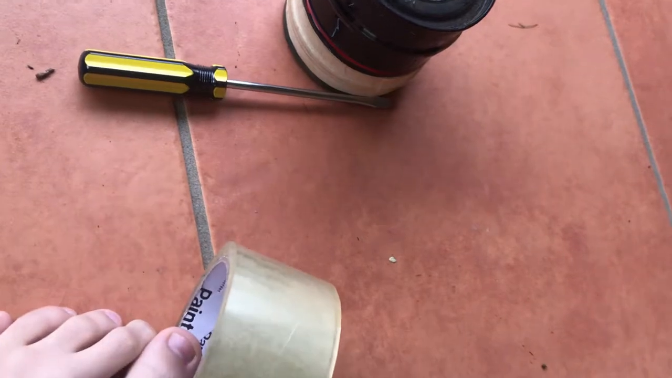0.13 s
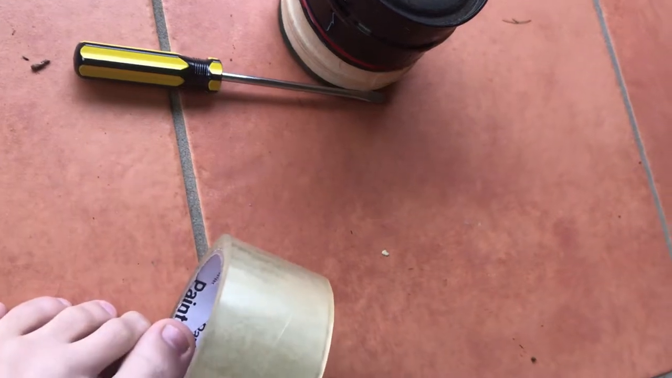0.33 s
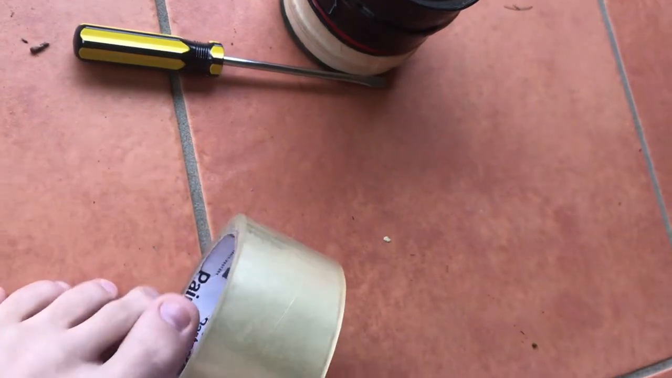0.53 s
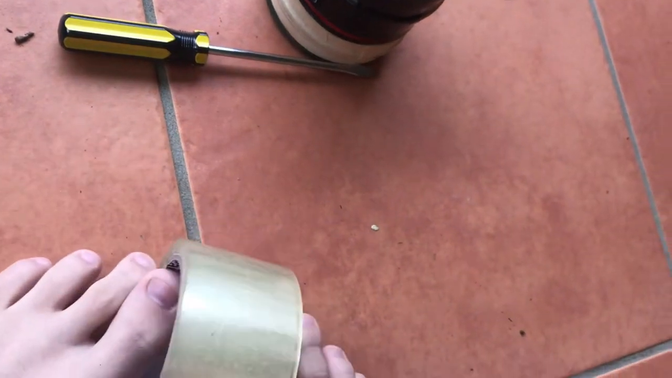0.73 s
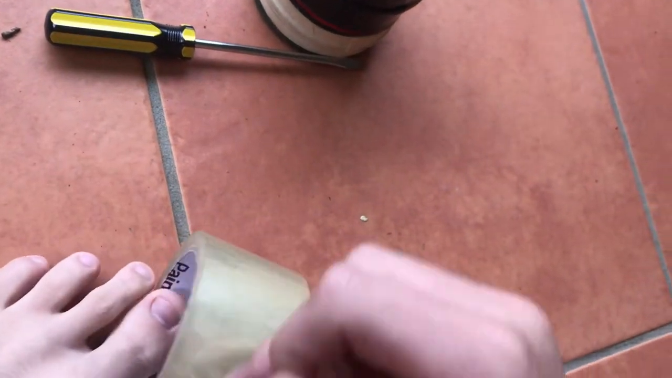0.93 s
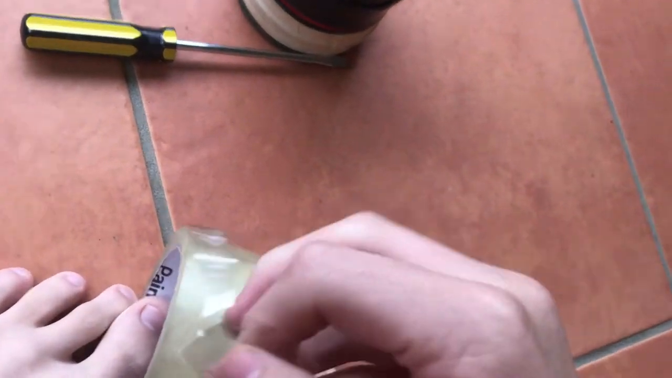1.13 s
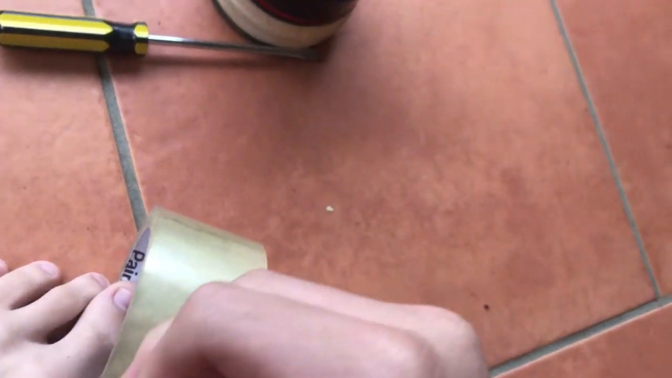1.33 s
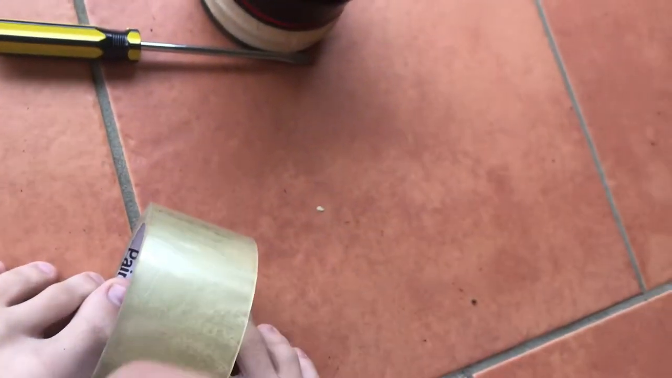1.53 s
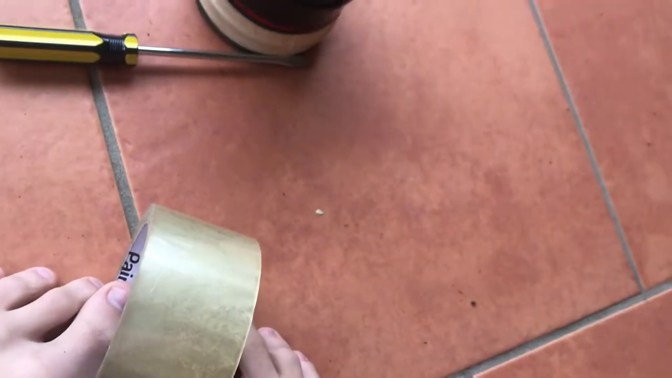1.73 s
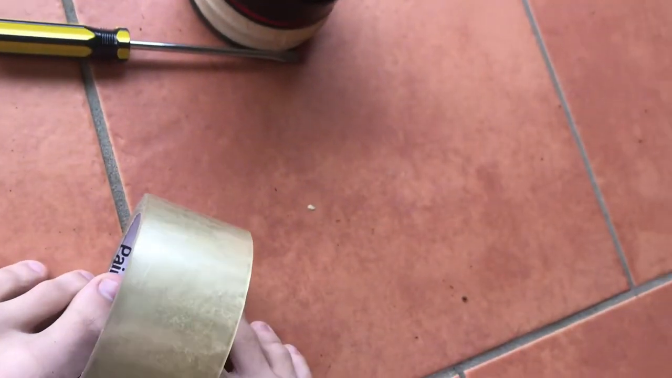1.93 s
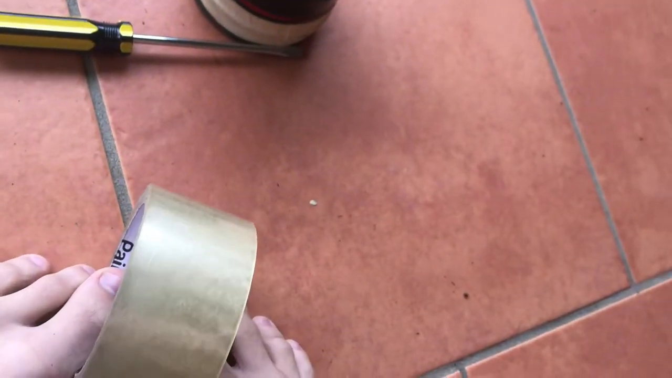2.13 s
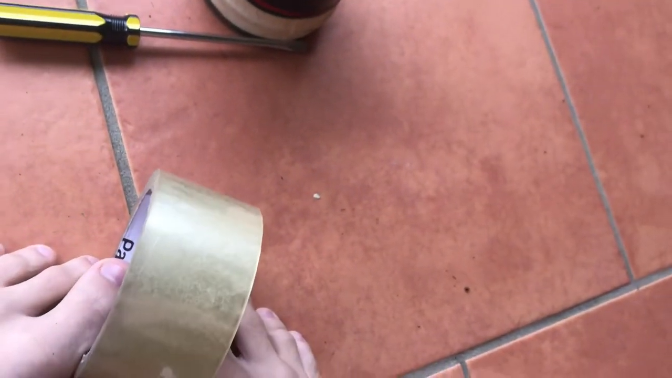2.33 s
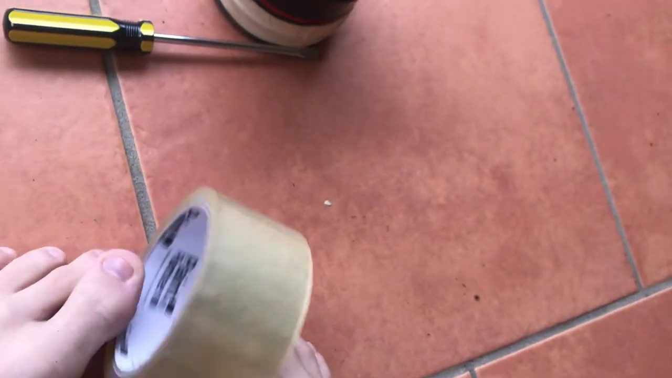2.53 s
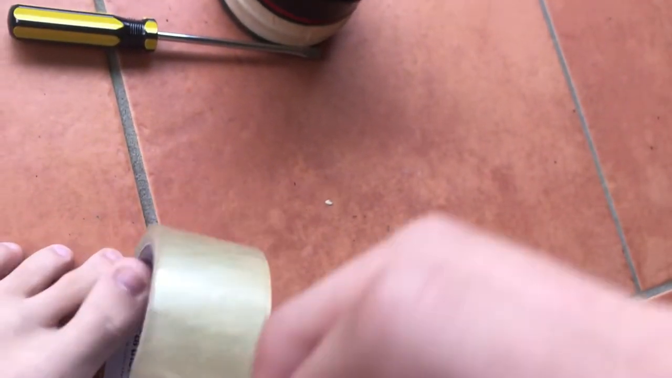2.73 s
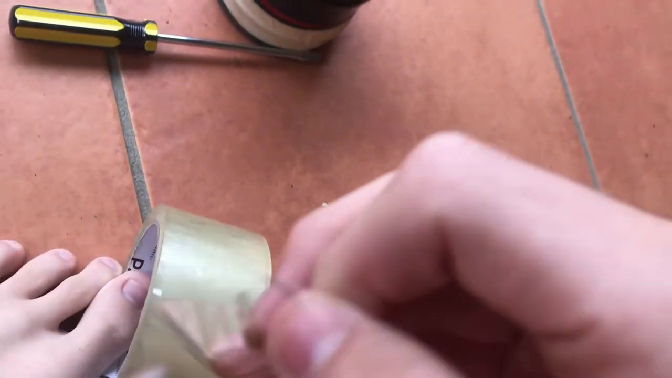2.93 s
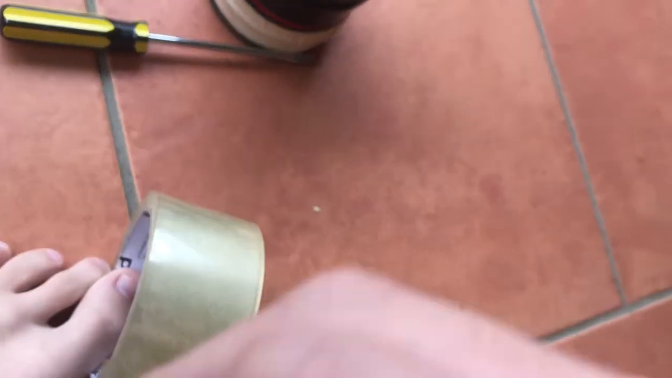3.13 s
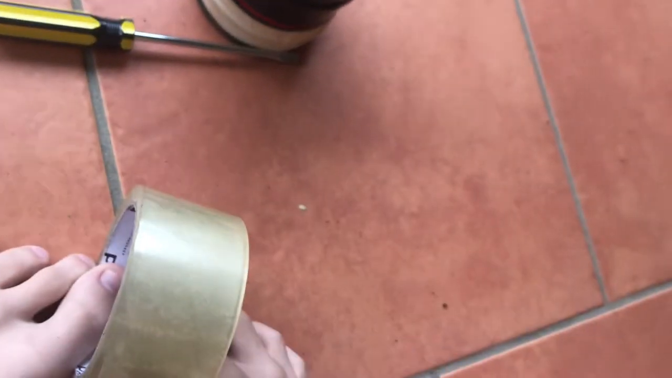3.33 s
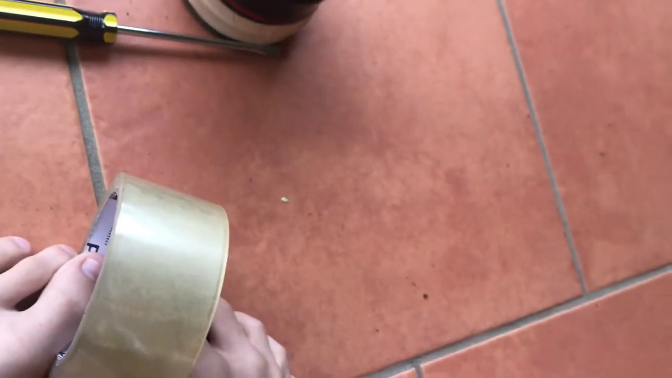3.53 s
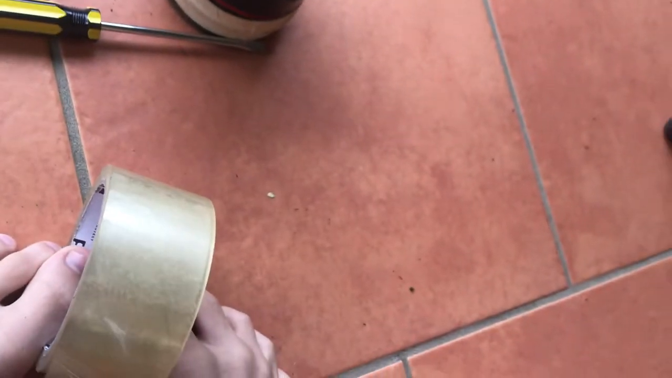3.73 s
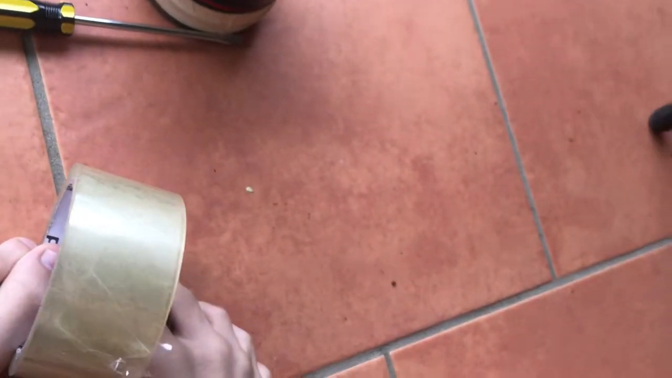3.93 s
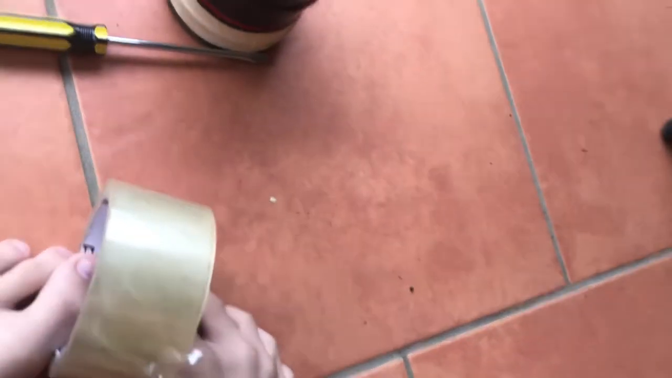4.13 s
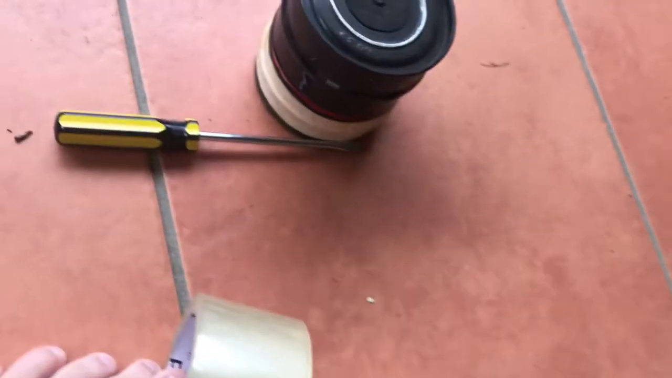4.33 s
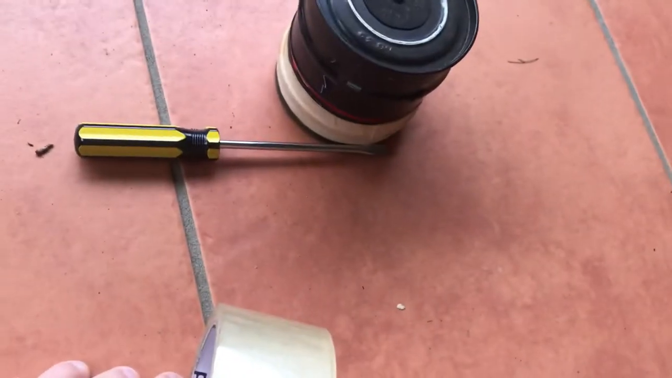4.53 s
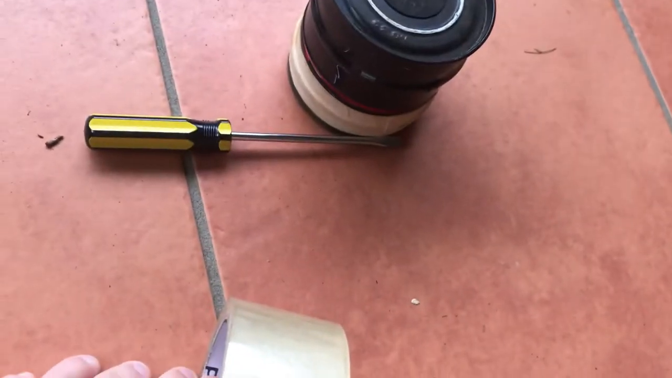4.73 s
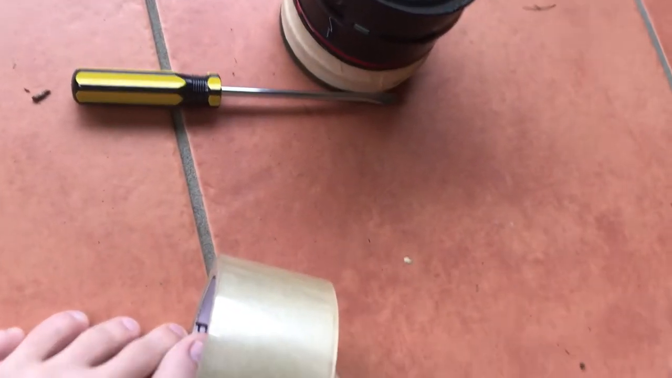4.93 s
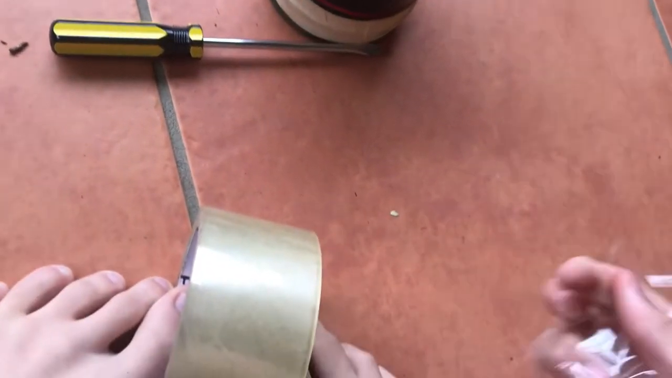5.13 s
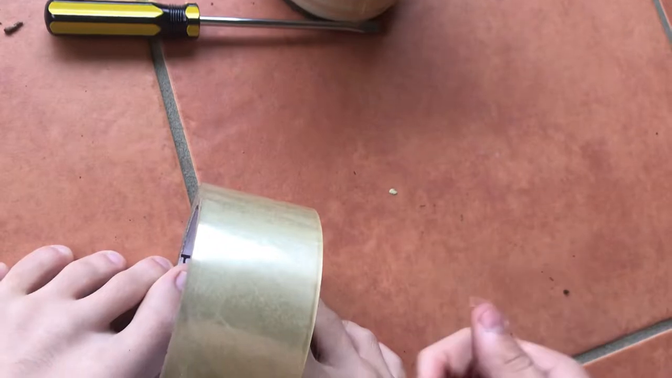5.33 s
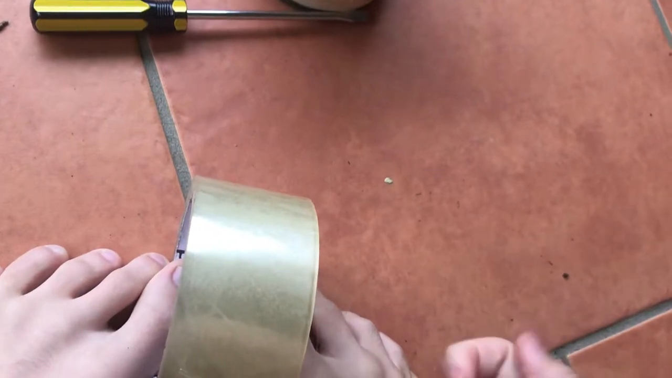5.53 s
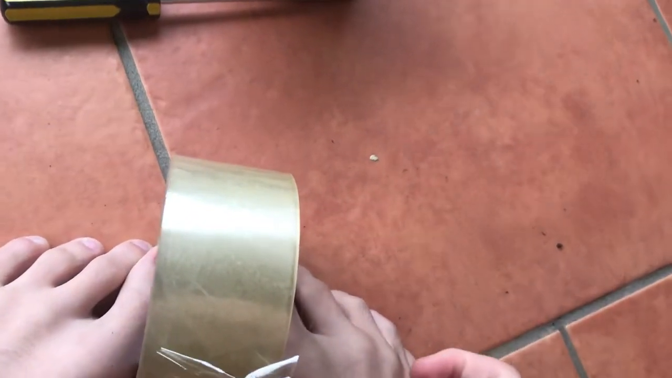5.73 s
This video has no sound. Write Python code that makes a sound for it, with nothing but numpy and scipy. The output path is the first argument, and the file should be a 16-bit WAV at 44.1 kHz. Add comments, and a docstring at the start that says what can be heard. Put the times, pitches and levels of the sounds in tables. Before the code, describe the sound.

Clear packing tape is ripped off its roll in sharp crackling volleys with low thumps, then loose film ticks and rustles in fingers.

```python
"""Sharp cracks tear out in quick volleys as clear packing tape is pulled off a roll on a tiled floor.
The glue fails by stick-slip: each slip is a burst of tiny fractures that rings the taut strip, and the
hardest send a dispersive bending wave along it, heard as a falling thump. Around and after the pulls
the loose film ticks, rustles and squeaks in the fingers as creases snap and skin drags on it. The roll
bumps dully against the feet, tiles and walls return a dense echo, and a low murmur dips and swells back."""
import sys
import numpy as np
from scipy import signal
from scipy.fft import rfft, irfft
from scipy.io import wavfile

SR = 44100
rng = np.random.default_rng(int(sys.argv[2]) if len(sys.argv) > 2 else 0)


def output_pcm(signal):
    """Save a mono or channel-first signal as 16-bit PCM at the path in sys.argv[1].

    Samples are clipped to [-1, 1] before scaling.
    """
    pcm = np.clip(np.atleast_2d(signal).T, -1, 1) * 32767
    wavfile.write(sys.argv[1], SR, np.round(pcm).astype(np.int16))


N = 255331
TIME = np.arange(N) / SR


def gain_of(db):
    """Logarithmic level: 20 dB is a factor of ten in amplitude."""
    return 10 ** (np.asarray(db) / 20)


def evened(x):
    """Power normalisation: scales a signal to rms 1."""
    return x / np.sqrt(np.mean(x ** 2) + 1e-20)


def read(points, hz):
    """Constant-ratio hearing: interpolates a spectrum table on a logarithmic frequency axis."""
    table_hz, value = np.transpose(points)
    return np.interp(np.log(hz + 1), np.log(table_hz + 1), value)


def add(mix, s, sound):
    """Superposition: sums a sound into the mix, in place, at time s."""
    part = mix[max(round(s * SR), 0):][:len(sound)]
    part += sound[:len(part)]


def colour(x, points, size=4096):
    """Minimum-phase filtering: a causal filter with the given spectrum keeps attacks sharp."""
    log_gain = np.log(gain_of(read(points, abs(np.fft.fftfreq(size, 1 / SR)))))
    # the phase of a minimum-phase filter is the Hilbert transform of its log gain
    spectrum = np.exp(np.conj(signal.hilbert(log_gain)))
    taps = np.fft.ifft(spectrum).real
    return signal.oaconvolve(x, taps[:size // 2])[:N]


def resonate(x, hz, width_hz):
    """Damped resonance of peak gain 1: shifts the curve hz to zero, smooths, and shifts back."""
    turn = np.exp(2j * np.pi * np.cumsum(hz) / SR)
    r = np.exp(-np.pi * width_hz / SR)
    smoothed = signal.lfilter([1 - r], [1, -r], x / turn + 1e-18)
    return 2 * (turn * smoothed).real


def slips(rise_s=0.000086, sag_db=4, fall_s=0.0033, flutter_db=-16, flutter_fall_s=0.015, size=2048):
    """Stick-slip fracture: the glue fails across the width of the tape, then the film shivers briefly."""
    # slips of the peel line: (time [s], relative level [dB], length [s])
    slip_table = [(0.0, -13, 0.0013), (0.0129, -15.5, 0.0095), (.033, -13, 0.0062), (0.11, -13, 0.0069),
                  (0.1292, -14, 0.0083), (0.1395, -18.5, 0.016), (0.1589, -9, 0.0012), (0.252, -10, 0.0019),
                  (0.26, -13.5, 0.0035), (.2693, -14, 0.0025), (0.971, -20, 0.0014), (1.1095, -22, 0.0014),
                  (1.1731, -13.5, 0.0012), (1.2038, -11, 0.00098), (1.2112, -10, 0.0021),
                  (1.2496, -11, 0.0025), (1.2803, -9, .002), (1.3246, -7.5, 0.00093),
                  (1.3356, -15.5, 0.0022), (1.3651, -14.5, 0.0068), (1.3779, -10, 0.0028),
                  (1.3982, -10, 0.0014), (1.411, -11, 0.0021), (1.4224, -15, 0.0059), (1.4338, -7, 0.00096),
                  (1.457, -11, 0.0013), (1.4662, -10.5, 0.0016), (1.492, -7.5, 0.00081),
                  (1.526, -10, 0.0018), (1.5573, -8.5, 0.0017), (1.586, -13, 0.0091), (1.61, -11.5, 0.0035),
                  (1.623, -11.5, 0.004), (1.637, -7.5, 0.0013), (1.655, -14.5, 0.0097),
                  (1.6952, -14.5, 0.0024), (1.781, -6, 0.0012), (1.7902, -14.5, 0.0035),
                  (1.8216, -9, 0.0024), (1.8716, -6.5, 0.00066), (1.908, -8.5, 0.0023),
                  (1.9465, -10.5, 0.0014), (1.986, -10.5, 0.00094), (2.0119, -12.5, 0.0017),
                  (2.0585, -13, 0.0031), (2.0775, -16.5, 0.0031), (2.1083, -13, 0.0017),
                  (2.1242, -15, 0.0013), (2.1374, -13.5, 0.0023), (2.1805, -11.5, .0025),
                  (2.7285, -14.5, 0.00094), (2.8613, -11, 0.0013), (2.8967, -14.5, 0.0018),
                  (2.9272, -12.5, 0.0045), (2.989, -15.5, 0.012), (3.0301, -15, 0.013),
                  (3.0502, -16.5, 0.01), (3.0677, -14.5, 0.0089), (3.1106, -13.5, 0.0052),
                  (3.1642, -15, 0.0031), (3.1946, -17.5, 0.0094), (3.2438, -14, 0.0023),
                  (3.276, -11.5, 0.0032), (3.4415, -8, .0035), (3.5098, -15, 0.0053), (3.56, -9, 0.0025),
                  (3.6638, -14, 0.0036), (3.777, -15.5, 0.0056), (3.7917, -16, 0.0034)]
    # colour that the roll gives to each crack: (frequency [Hz], gain [dB])
    roll_colour = [(100, 1.5), (300, 0), (550, 1), (800, -5.5), (1050, 0), (1500, -4.5), (1900, 0),
                   (2800, 1.5), (3500, -0.5), (5500, -0.5), (9500, -0.5), (10400, -3.5), (11600, -0.5),
                   (15500, -2)]
    out, t = np.zeros(N), np.arange(size) / SR
    flutter = gain_of(flutter_db) * np.exp(-t / flutter_fall_s)
    for s, db, length in slip_table:
        length, pull = max(length, 1 / SR), pull_at(s)
        running = gain_of(-sag_db * np.minimum(t / length, 1))
        running = running * np.exp(-np.maximum(t - length, 0) / fall_s)
        shape = (1 - np.exp(-t / rise_s)) * np.hypot(running, flutter)
        burst = crack(shape, pull["body_db"], pull["sizzle_db"], grain_db=3.5)
        # longer slips release more energy
        add(out, s, gain_of(db) * np.sqrt(length * SR) * burst)
    return gain_of(1.98) * colour(out, roll_colour)


def crack(shape, body_db, sizzle_db, grain_db):
    """Fracture noise: a volley of uneven micro-fractures under an envelope, in three bands; energy 1."""
    # body, middle and sizzle bands: (lower edge [Hz], upper edge [Hz])
    crack_bands = [(400, 1400), (1400, 5500), (5500, 17000)]
    out = np.zeros(len(shape))
    # each random strength holds for 8 samples
    grain = np.repeat(rng.standard_normal(len(shape)), repeats=8)[:len(shape)]
    sizes = shape * gain_of(grain_db * grain)
    for edges, db in zip(crack_bands, (body_db, 0, sizzle_db)):
        volley = sizes * rng.standard_normal(len(shape))
        band = signal.lfilter(*signal.butter(2, edges, "bandpass", fs=SR), volley)
        out += gain_of(db) * evened(band)
    # a reflection from the edge of the film interferes, so each crack is coloured differently
    delay_s = rng.uniform(0.00018, 0.0009)
    add(out, delay_s, 0.18 * rng.choice([-1, 1]) * out)
    return out / np.linalg.norm(out)


def pull_at(t):
    """Tension and free length set the pitch: the strip tightens and glides during the latest pull."""
    # pulls of the hand: (start [s], length [s], time to tighten [s], first pitch [Hz], last pitch [Hz],
    # first ring [dB], last ring [dB], strip body [dB], crack body [dB], crack sizzle [dB], echo [dB])
    pull_table = np.array([(-0.02, .32, .01, 974, 674, 5.5, 0, 0, -6, -2, -2),
                           (0.939, 0.44, 1, 968, 697, -3, 7.5, -12, 6.5, -2.5, 0),
                           (1.293, 0.38, .01, 739, 480, 10.5, 4.5, 0.5, -5.5, -3, -2.5),
                           (1.752, 0.42, 0.0075, 885, 1280, -9.5, 0.5, -7, 1, 1, -7),
                           (2.712, 0.84, 0.35, 964, 1090, -14.5, -12.5, 1, -4.5, 1.5, -.5),
                           (3.39, 0.4, 0.0077, 1094, 936, -5, -10, -2.5, .5, 1.5, 0.5)])
    now = pull_table[np.maximum(np.searchsorted(pull_table[:, 0], t, "right") - 1, 0)]
    (start, length, tighten, first_hz, last_hz, first_ring, last_ring,
     strip_db, body_db, sizzle_db, echo_db) = now.T
    slack = np.clip(1 - (t - start) / tighten, 0, 1)
    progress = np.clip((t - start) / length, 0, 1)
    # a slack strip cracks thinner and brighter, with weaker broad strip modes; the echo, too, starts lower in
    # these # pulls and grows as they go on
    return dict(pitch=first_hz * (last_hz / first_hz) ** progress,
                ring_db=first_ring + (last_ring - first_ring) * progress,
                strip_db=strip_db - 11 * slack, echo_db=echo_db - 7.5 * slack,
                body_db=body_db - 17.5 * slack, sizzle_db=sizzle_db + 5 * slack)


def strip(cracks, pull, ring_width_hz=30):
    """Forced modal vibration: cracks shake the taut strip, whose narrow lowest note outlasts them."""
    # broad modes of the strip: (multiple of its pitch, width [Hz], relative level [dB])
    mode_table = [(0.998, 219, -3), (1.851, 271.4, -4.5), (3.252, 392, -7.5)]
    body = sum(gain_of(db) * resonate(cracks, k * pull["pitch"], width) for k, width, db in mode_table)
    ring = resonate(cracks * gain_of(pull["ring_db"]), pull["pitch"], ring_width_hz)
    return gain_of(pull["strip_db"]) * body + ring


def twangs(spread=.03, count=9):
    """Free decay of close modes: held tight after a slip, the tape rings on in beating clusters."""
    # notes left singing in the tape: (time [s], centre [Hz], onset level [dB], 60 dB decay time [s])
    twang_table = [(0.018, 933, -15, 0.12), (0.15, 1610, -37.5, 0.65), (0.27, 1546, -34, 0.48),
                   (.27, 694, -25.5, 0.23), (0.269, 2400, -29.5, 0.22), (1.211, 1040, -30.5, 0.3),
                   (1.281, 718, -27, 0.37), (2.18, 1163, -33, 0.22), (2.927, 232, -38.5, 0.42),
                   (3.195, 700, -29, .1), (3.248, 243, -32, 0.27), (3.444, 1040, -25, .22)]
    out, t = np.zeros(N), np.arange(SR // 2) / SR
    for s, hz, db, t60 in twang_table:
        mode_hz = hz * (1 + spread * rng.standard_normal(count))
        cluster = sum(np.sin(2 * np.pi * (f * t + rng.random())) for f in mode_hz)
        add(out, s, gain_of(db - 60 * t / t60) * cluster / np.sqrt(count))
    return out


def whips(lead_s=0.00025, rise_s=0.00047, fall_s=0.02, low_hz=38, size=6000):
    """Bending-wave dispersion: high frequencies arrive first, and the pitch falls to a thump."""
    # hard slips that whip the strip: (time [s], relative level [dB])
    whip_table = [(0.132, -8), (0.269, -12), (1.6335, -5), (1.6654, -0.8), (1.696, -10), (1.781, -2.5),
                  (1.8205, -10), (1.873, -8), (1.9078, -7), (1.948, -3), (1.988, -1.5), (2.0118, -5),
                  (2.0588, -5), (2.1404, -7.5), (3.04, -26), (3.064, -26), (3.1103, -27), (3.5103, -17),
                  (3.56, -2.5), (3.6646, -3.5), (3.778, -2.5)]
    out, t = np.zeros(N), np.arange(size) / SR
    shape = (1 - np.exp(-t / rise_s)) * np.exp(-t / fall_s)
    for s, db in whip_table:
        # logarithmic phase: the frequency falls as 1 / (t + lead_s)
        turns = rng.uniform(0.3744, 0.494) * np.log1p(t / lead_s)
        add(out, s, -gain_of(db + 3.0) * shape / shape.max() * np.sin(2 * np.pi * turns))
    return signal.lfilter(*signal.butter(2, low_hz, "highpass", fs=SR), out)


def crinkles(rise_s=0.00083, fall_s=.0012, shiver_db=-20, shiver_fall_s=0.0092, sizzle_db=-2.2, size=1500):
    """Snap-through buckling: creases in the loose film flip over, each a short bright tick."""
    # single crinkles that stand out, loud ones and faint ones in quiet moments:
    # (time [s], relative level [dB], body relative to the middle band [dB])
    crinkle_table = [(.607, -27, 8), (.6754, -17.5, 8), (0.899, -29.5, -3), (2.4947, -35, -13),
                     (2.6872, -28.5, -10), (4.064, -25, 4), (4.13, -13, -10), (4.363, -20.5, 4.5),
                     (4.5087, .5, -3), (4.5447, -5.5, -7), (4.562, -12.5, -11), (4.63, -23, -5),
                     (4.6552, -17.5, -21), (4.704, -20, -25), (4.736, -22, -16), (4.7813, -2.5, -26),
                     (5.014, -1.5, -12), (5.033, -10, -5), (5.042, -14.5, -5), (5.0791, -12.5, -4),
                     (5.1287, -17.5, -11), (5.1493, -14, -9), (5.2132, -18, -9), (5.2603, -10, -10),
                     (5.2941, -7, -17), (5.316, -3.5, -10), (5.3518, -15, -23), (5.363, -13, -25),
                     (5.4042, -12, -25), (5.4274, -12.5, -22), (5.447, -14.5, -16), (5.4759, -10.5, -14),
                     (5.611, -9.5, -23), (5.667, -10.5, 5), (5.697, -16.5, 1), (5.7398, -13.5, -25),
                     (5.7688, -20.5, -24)]
    # colour of the ticks: (frequency [Hz], gain [dB])
    tick_colour = [(200, -31.5), (700, -9), (1600, -7), (2800, -1.0), (4500, -1.5), (6300, 5.5),
                   (9500, 2.5), (10400, 0), (12000, 4.5), (16000, 2.5)]
    out, t = np.zeros(N), np.arange(size) / SR
    shiver = gain_of(shiver_db) * np.exp(-t / shiver_fall_s)
    shape = (1 - np.exp(-t / rise_s)) * np.hypot(np.exp(-t / fall_s), shiver)
    for s, db, body_db in crinkle_table:
        tick = crack(shape, body_db, sizzle_db, grain_db=3.0)
        add(out, s, gain_of(db) * np.linalg.norm(shape) * tick)
    return gain_of(-3.0) * colour(out, tick_colour)


def rustle(ticks_per_s=280, spread_db=5, fall_s=0.0011, relative_width=1.0, hiss_db=-11, count=7):
    """Random impulse excitation: sliding film scatters small ticks, pitched by crease, over faint hiss."""
    # range of pitches at which creases of different sizes ring: (lowest [Hz], highest [Hz])
    crease_range = (2000, 14000)
    # colour of the sliding film: (frequency [Hz], relative density [dB per Hz])
    film_colour = [(200, -34), (500, -36), (700, -13), (1500, -10), (2000, -5), (2800, -1.5), (4500, -3.5),
                   (6300, -2), (8000, -7), (9500, -0.5), (10400, -8), (12000, -2), (16000, -9)]
    ticks = np.zeros(N)
    for hz in np.geomspace(*crease_range, count):
        snaps = scatter(N, ticks_per_s / count, spread_db, fall_s) * rng.standard_normal(N)
        ticks += resonate(snaps, np.full(N, hz), relative_width * hz) + gain_of(-4.0) * snaps
    grains = evened(ticks) + gain_of(hiss_db) * rng.standard_normal(N)
    return sliding() * evened(colour(grains, film_colour))


def sliding():
    """Amplitude modulation: each slide through the fingers swells and fades in one arch."""
    # slides of the film: (start [s], length [s], peak level [dB])
    slide_table = [(0.496, 0.17, -57), (0.722, 0.083, -59), (.9, 0.12, -49.5), (1.056, 0.14, -50),
                   (2.64, 0.074, -59.5), (2.75, 0.14, -57), (3.983, 0.18, -58), (4.218, 0.34, -53),
                   (4.352, 0.053, -45.5), (4.429, 0.19, -34), (4.767, 0.03, -25.5), (4.93, 0.14, -45),
                   (5.052, .12, -40.5), (5.168, .1, -41.5), (5.284, 0.1, -30.5), (5.404, 0.058, -42),
                   (5.502, 0.19, -28.5), (5.595, 0.14, -38), (5.667, 0.14, -35.5)]
    out = np.zeros(N)
    for s, length, db in slide_table:
        add(out, s, gain_of(db) * np.hanning(round(length * SR)))
    return out


def rubs(relative_width=0.24, slips_per_s=380, spread_db=8.0, fall_s=0.00165):
    """Frictional stick-slip: skin drags in tiny slips and shakes a patch of film into a fuzzy squeak."""
    # fingers dragging on the film: (start [s], length [s], pitch [Hz], level [dB])
    rub_table = [(2.495, 0.1, 5890, -63.5), (4.43, 0.125, 2560, -37.5), (4.753, 0.071, 6600, -33.5),
                 (5.003, 0.1, 2800, -37.5), (5.174, 0.056, 3280, -49), (5.384, 0.07, 3050, -40)]
    out = np.zeros(N)
    for s, length, hz, db in rub_table:
        pitch = np.full(round(length * SR), hz)
        width_hz = relative_width * hz
        drag = scatter(len(pitch), slips_per_s, spread_db, fall_s) * rng.standard_normal(len(pitch))
        squeak = resonate(resonate(drag, pitch, width_hz), pitch, width_hz)
        arch = np.sin(np.linspace(0, np.pi, len(pitch)))
        add(out, s, gain_of(db) * evened(squeak) * arch)
    return out


def scatter(size, per_s, spread_db, fall_s):
    """Shot process: random tiny slips of uneven strength, each decaying exponentially; rms 1."""
    strengths = gain_of(spread_db * np.minimum(rng.exponential(1, size), 3.5))
    impulses = strengths * (rng.random(size) < per_s / SR)
    return evened(signal.lfilter([1], [1, -np.exp(-1 / (SR * fall_s))], impulses))


def bumps(fall_s=0.0069, size=4000):
    """Heavily damped impact: the roll shifts against the feet in dull, ringless pushes."""
    # soft bumps: (time [s], level [dB], upper frequency [Hz])
    bump_table = [(0.454, -44, 147), (2.347, -60.5, 151), (3.978, -51, 180), (4.062, -46, 617)]
    out, t = np.zeros(N), np.arange(size) / SR
    for s, db, top_hz in bump_table:
        push = evened(signal.lfilter(*signal.butter(2, top_hz, fs=SR), rng.standard_normal(size)))
        add(out, s, gain_of(db) * push * t / fall_s * np.exp(1 - t / fall_s))
    return out


def room(x, delay_s=0.0048, size=256, shift_hz=7, count=3):
    """Diffuse reverberation: dense reflections from tiles and walls, each band dying at its own speed."""
    # decay of the tiled room: (frequency [Hz], 60 dB decay time [s])
    decay_table = [(150, .3), (500, .38), (1500, .43), (4000, .43), (9000, .39), (16000, .3)]
    # strength of its echo: (frequency [Hz], level [dB])
    echo_table = [(100, -22), (500, -16), (1500, -14.5), (4000, -15.5), (9000, -16), (16000, -17)]
    out = np.zeros(N)
    for k in range(count):
        hz, t, z = signal.stft(rng.standard_normal(SR), SR, nperseg=size)
        decay = gain_of(-60 * t / read(decay_table, hz)[:, None])
        band_energy = SR * np.mean(decay ** 2, axis=1, keepdims=True)
        decay *= gain_of(read(echo_table, hz))[:, None] / np.sqrt(band_energy)
        tail = signal.istft(z * decay, SR, nperseg=size)[1]
        # the tape moves, so the pattern of reflections keeps changing
        share = np.sqrt(2 / count) * np.cos(np.pi * (shift_hz * TIME + k / count))
        response = np.r_[np.zeros(round(delay_s * SR)), tail]
        out += signal.fftconvolve(x * share, response)[:N]
    return out


def floor():
    """Spectrally shaped noise: the low murmur of the room, which dips after loud pulls and swells back."""
    # spectrum of the quiet room: (frequency [Hz], relative density [dB per Hz])
    air_colour = [(20, -18.5), (45, -1.5), (80, 2.5), (105, 4.5), (140, -6.5), (220, -4), (330, -10.5),
                  (600, -19.5), (1200, -20.5), (2500, -26), (6000, -34), (16000, -41.5)]
    # the murmur as heard, dipping after loud pulls and swelling back: (time [s], level [dB])
    air_level = [(.3, -57.5), (.9, -48.5), (1.6, -51), (2.3, -67), (2.6, -58), (2.85, -50.5), (3.4, -48.5),
                 (3.95, -61), (4.5, -52), (5.79, -53)]
    spectrum = rfft(rng.standard_normal(N)) * gain_of(read(air_colour, np.fft.rfftfreq(N, 1 / SR)))
    air = irfft(spectrum, N)
    return evened(air) * gain_of(np.interp(TIME, *np.transpose(air_level)))


def scene():
    """Direct and reverberant fields add: the tape and its echo; the whips are felt only near the strip."""
    cracks, pull = slips(), pull_at(TIME)
    peel = gain_of(0.5) * cracks + gain_of(2.5) * strip(cracks, pull) + twangs()
    film = crinkles() + rustle() + rubs()
    # the loose film sends a fixed share into the room
    echo = room(gain_of(pull["echo_db"]) * peel + gain_of(-2.5) * film)
    return (peel + film + echo + whips() + bumps() + floor())[None]


def record(dry, low_hz=30, ceiling=1.05, order=6, edge_hz=16050):
    """Transducer limits: the microphone drops deep bass and rounds loud peaks; then the band limit."""
    thinned = signal.lfilter(*signal.butter(2, low_hz, "highpass", fs=SR), dry)
    rounded = thinned / (1 + abs(thinned / ceiling) ** order) ** (1 / order)
    band_limit = signal.firwin(255, edge_hz, window=("kaiser", 8), fs=SR)
    return signal.oaconvolve(rounded, band_limit[None], "same")


dry = scene()
out = record(dry)
output_pcm(out)
```